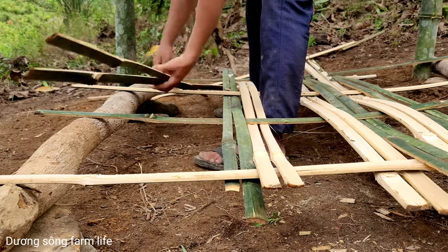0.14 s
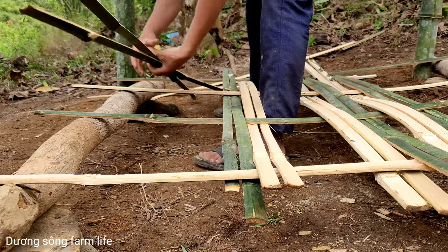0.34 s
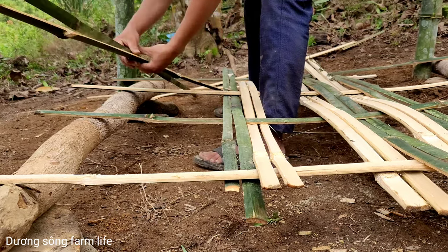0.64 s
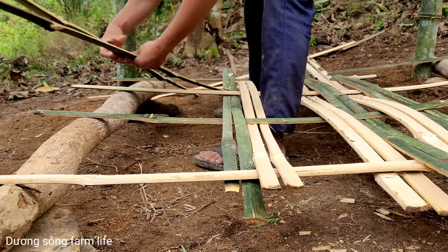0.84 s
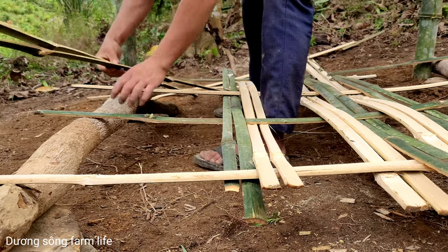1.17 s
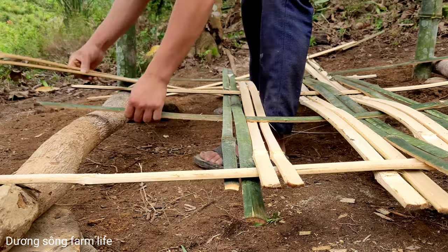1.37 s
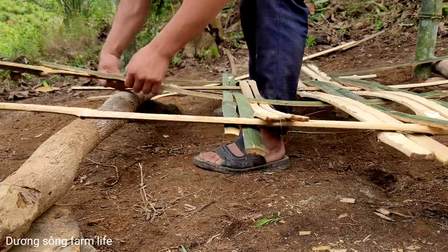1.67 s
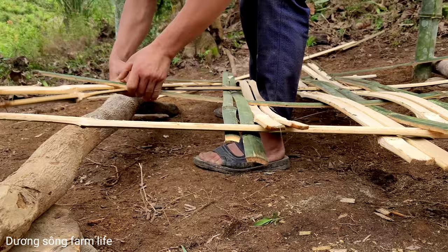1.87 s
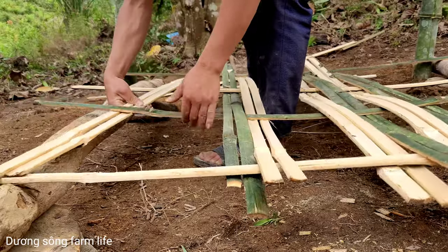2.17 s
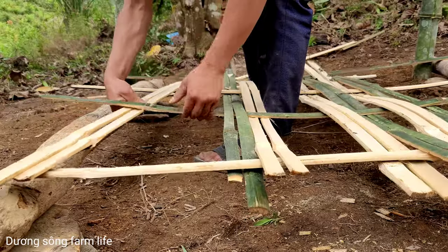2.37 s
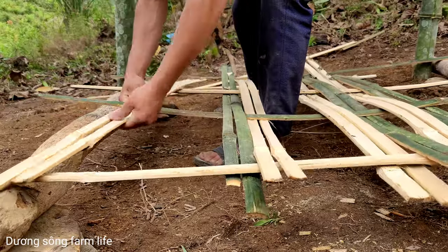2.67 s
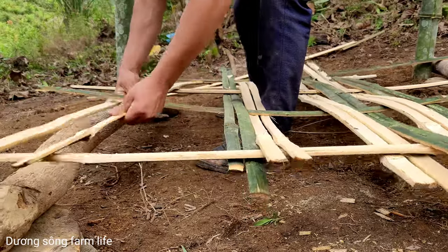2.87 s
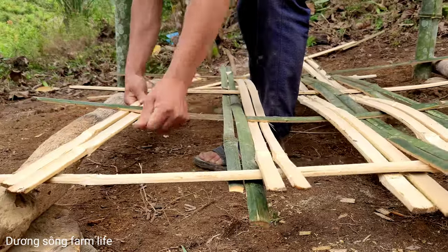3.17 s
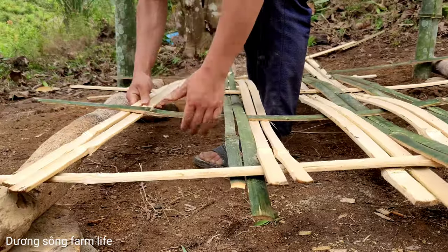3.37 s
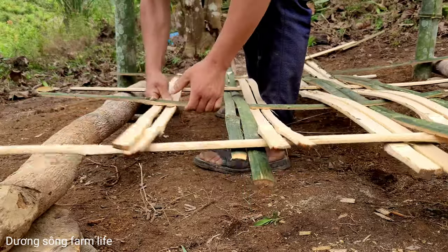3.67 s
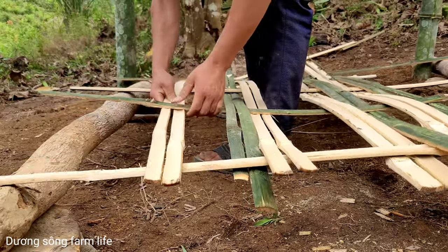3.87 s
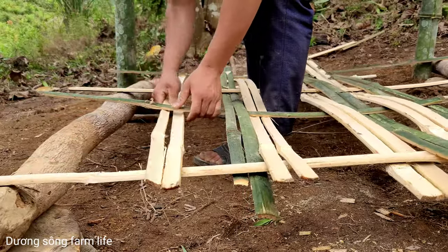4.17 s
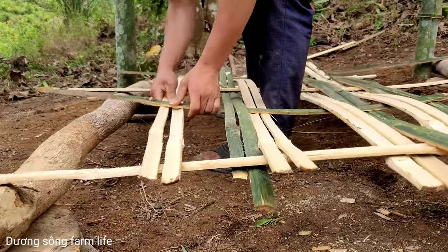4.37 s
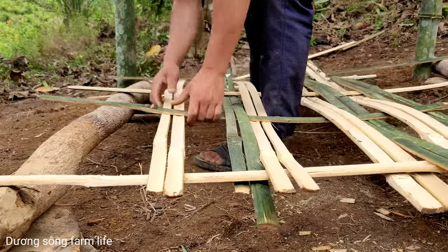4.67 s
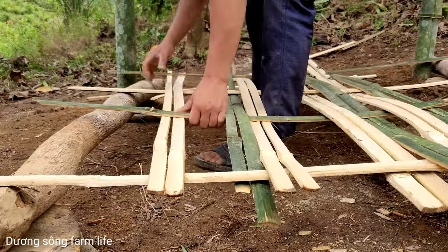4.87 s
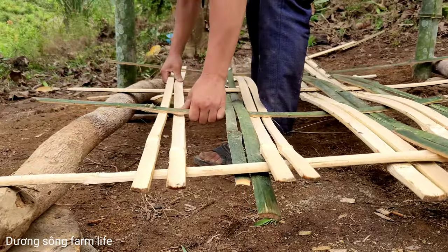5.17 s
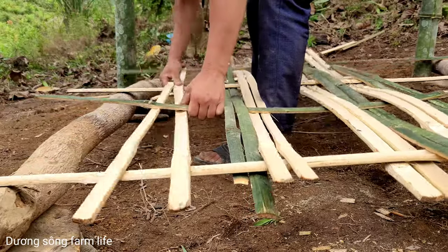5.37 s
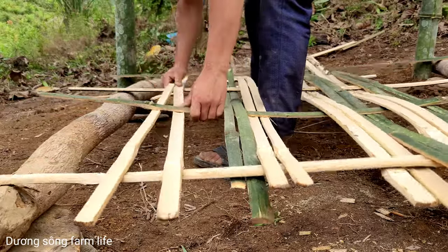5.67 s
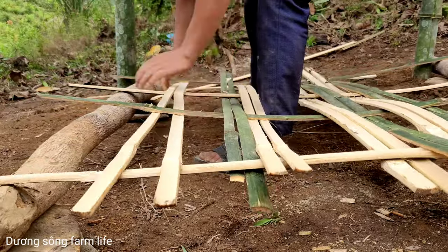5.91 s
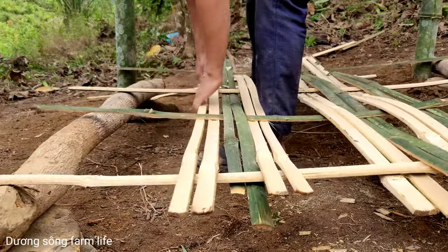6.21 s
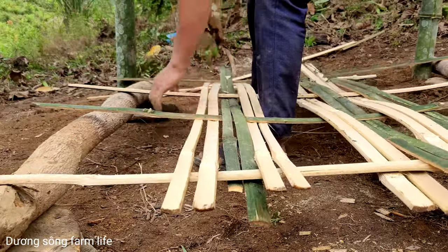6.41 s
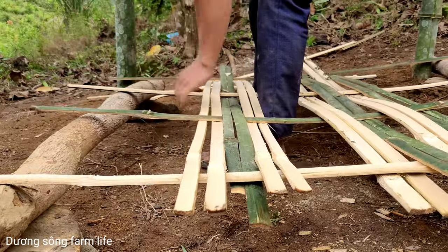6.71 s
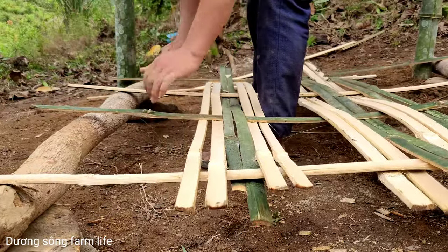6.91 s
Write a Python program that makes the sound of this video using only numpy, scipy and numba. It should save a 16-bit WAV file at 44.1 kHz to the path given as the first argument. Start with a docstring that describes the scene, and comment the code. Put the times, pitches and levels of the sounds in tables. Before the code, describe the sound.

Split bamboo strips are handled and woven into a mat on the ground outdoors. Soft rustles and scrapes come first, then irregular sharp clacks and hollow woody knocks in small clusters as strips slide over each other and drop into place. The sharpest hits fall in the middle and toward the end, with soft low thuds under them. The work sounds close, over a quiet hush and faint high insect tones.

```python
"""Weaving a bamboo mat

Split bamboo strips are lifted, pushed through a half-woven mat and dropped into place, outdoors.
Hard edges clack and slide on each other, springy strips knock and wobble, and the mat thuds on
bare earth. Insects hold thin high tones over a quiet open-air hush."""
import sys
import numpy as np
from scipy import signal
from scipy.fft import rfft, irfft, next_fast_len
from scipy.io import wavfile
from scipy.ndimage import uniform_filter1d
from numba import njit

SR = 44100
rng = np.random.default_rng(int(sys.argv[2]) if len(sys.argv) > 2 else 0)


def pcm_store(signal):
    """Save signal as 16-bit PCM."""
    levels = np.round(np.clip(np.atleast_2d(signal), -1, 1) * 32767)
    wavfile.write(sys.argv[1], SR, levels.astype(np.int16).T)


N = 310893
HIT_SAMPLES = SR * 2 // 5
CLACK_BUILD_S = .003

# Edge hits edge. Each row: start in seconds, nominal level in dB, woodiness in dB, brightness in dB.
EDGE_HITS = [(1.506, -54.5, -1, -1.5), (1.975, -37.5, -3.5, -8), (1.996, -30, -2, -7.5),
             (2.195, -40, -6, -20), (2.399, -43, -18, 2.5), (2.716, -35.5, -4.5, -11),
             (2.953, -28.5, -4, -7.5), (3.1253, -17.5, -7.5, -3), (3.158, -17.5, -6.5, -4.5),
             (3.212, -40, -2, -8), (3.845, -43, -5, -11), (3.961, -32.5, -4, -16.5), (4.089, -42, -5, -8),
             (4.348, -54.5, 3.5, -21), (4.577, -28, 1.5, -11), (4.6112, -35, -7, -0.5),
             (4.69, -25.5, -2, -2), (4.75, -41, 1.5, -13), (5.159, -47.5, -6.5, -16), (5.221, -50, -15, 2),
             (5.351, -42.5, -12, -1), (5.385, -29, -3.5, -9), (5.396, -29, -1, -9.5),
             (5.472, -12.5, -14.5, -4.5), (6.192, -28.5, -3, -5), (6.216, -25, -2, -5.5),
             (6.233, -25.5, -8, -22), (6.283, -17, -8.5, -16.5), (6.6, -45, 2.5, -9), (6.622, -19, -7, 0),
             (6.638, -20, -6.5, -9)]
# A strip lands, or knocks as it rubs: the row at 6.239 s is the woody body of the stroke there. Each row: start
# in seconds, nominal level in dB, the mat's thud in dB relative to that, strongest resonance in Hz.
LANDINGS = [(0.06, -53.5, -16, 290), (0.305, -66, -20, 1110), (0.638, -63.5, -13, 745),
            (0.856, -55, -19, 748), (1.595, -57, -19, 522), (1.84, -53.5, -2.5, 537),
            (1.997, -40, -18, 562), (2.101, -43, -13, 1092), (2.373, -43.5, -26, 770),
            (2.722, -42.5, -16, 773), (2.821, -49.5, -18, 521), (2.954, -37.5, -19, 1150),
            (3.126, -32, -12, 716), (3.159, -29, -9, 651), (3.498, -58.5, -18, 450),
            (3.647, -44.5, -26, 813), (3.823, -38.5, -19, 800), (3.844, -35.5, -12, 1020),
            (3.959, -44, -12, 1204), (4.081, -39, -9.5, 554), (4.487, -40.5, -7, 762),
            (4.579, -30, -10, 897), (4.612, -29, -11, 821), (4.689, -24.5, -12, 1043),
            (4.713, -33.5, -16, 1009), (4.75, -40, -9.5, 747), (5.385, -33.5, -11.5, 1174),
            (5.475, -32.5, -19, 765), (5.533, -37, -11.5, 973), (5.563, -39, -20, 904),
            (5.59, -32, -21, 594), (5.755, -39.5, -4, 532), (5.879, -53.5, -23, 524),
            (5.979, -46, -17.5, 612), (6.089, -42.5, -3.5, 582), (6.218, -31, -32, 713),
            (6.239, -37, -30, 300), (6.283, -36, -27, 332), (6.375, -42, -22, 549),
            (6.625, -33.5, -23.5, 812)]
# How alike the two ears are. Each row: frequency in Hz, correlation.
EAR_LIKENESS = [(60, 0.87), (280, 0.9), (550, 0.65), (950, 0.28), (1150, -0.11), (1800, -0.091),
                (4500, 0.15), (12000, -0.0074)]


def clack(db, woody_db, bright_db):
    """A hard contact rings a crowd of short modes, and the strip's cross modes sing through it."""
    # Modes across the strip's width. Each row: pitch in Hz, level in dB, multiple of the ring time.
    cross_modes = [(3180, -34, .9), (4343, 0.5, 1.1), (4535, -1.5, 1.2), (5570, -7.5, .9), (5640, 4, 1.0),
                   (6300, -14, .7)]
    cross_hz, cross_db, life = np.transpose(cross_modes)
    # a loosely held strip is woodier and rings longer; a firm blow presses it still
    t60 = .05 * 2 ** (woody_db / 22.5 - (db + 37.5) / 69)
    edge = ring(cross_hz, cross_db, life * t60, travel=.001, build=CLACK_BUILD_S)
    # the glassy skin gives less wood and more of the cross modes than the soft inner side
    blow = level(edge, db - 7.5 - .33 * woody_db, span=.01)
    bands = ((crowd(998.5, 3000, count=20), woody_db + .4),
             (crowd(3000, 6500, count=34), -1.5),
             (crowd(6500, 16000, count=56), bright_db + .5))
    for hz, band_db in bands:
        octaves = np.log2(hz / 4400)
        slope_db = np.where(octaves < 0, -.5 * woody_db, .61 * bright_db - 8)
        band = ring(hz, slope_db * octaves, t60 * (4000 / hz) ** .28, travel=.0012, build=CLACK_BUILD_S)
        blow += level(band, db + band_db, span=.012)
    return blow


def clacks():
    """Edges clack and rebound once, faintly; the hands work a little to the left."""
    out = np.zeros((2, N))
    for s, db, woody_db, bright_db in EDGE_HITS:
        add(out, s - .001, clack(db, woody_db, bright_db))
        rebound_s = .041 * (1 + .12 * rng.standard_normal())
        add(out, s + rebound_s, clack(db - 27, woody_db, bright_db))
    return out * undb([[.6], [-.6]])


def knocks():
    """A landing strip rings its bending modes; the spot that is struck favours one of them."""
    # Bending modes of the laid strips. Each row: pitch in Hz, level in dB, ring time in seconds.
    bending_modes = [(259.5, -2, 0.11), (296.5, -4.5, 0.29), (325.5, -0.5, 0.15), (410, -13, 0.05),
                     (511, -4, 0.26), (626, -2, 0.13), (730, -1, 0.087), (802, -20.5, 0.12),
                     (835, 1.5, 0.091), (940, -13, 0.047), (1374, -5.5, 0.089), (1620, -8, 0.096),
                     (1740, -9, 0.11)]
    hz, mode_db, t60 = np.transpose(bending_modes)
    low = hz < 450
    out = np.zeros((2, N))
    for s, db, _, main_hz in LANDINGS:
        own_hz = hz * (1 + .012 * rng.standard_normal(len(hz)))  # no two strips are cut alike
        crowd_hz = crowd(366.2, 1173, count=20)
        # the soft contact hardly moves modes far above the main one
        own_db, crowd_db = (-10 * np.log10(1 + (f / (2.45 * main_hz)) ** 4) for f in (own_hz, crowd_hz))
        own_db += mode_db
        # a gentler landing is a longer push, with more wobble for its ring
        push_s = .00099 * undb(-.7 * (db + 36))
        wobble_db = db - 6.5 - .33 * (db + 42)
        body = ring(own_hz[~low], own_db[~low], t60[~low], travel=.00035, build=push_s)
        main = ring(np.array([main_hz]), 0, t60=.099, travel=.0004, build=push_s)
        neighbours = ring(crowd_hz, crowd_db, .083 * (800 / crowd_hz) ** .17, travel=.00035, build=push_s)
        wobble = ring(own_hz[low], own_db[low], t60[low], travel=.00064, build=push_s)
        knock = level(body, -5.5, span=.022) + level(main, -4.5, span=.021)
        knock += level(neighbours, -2.3, span=.01)
        add(out, s - .001, level(knock, db + .3, span=.029) + level(wobble, wobble_db, span=.038))
    return out


def slides():
    """Fibres catch and slip in a grainy hiss that swells with the speed of a stroke or skid."""
    # Strip rubs along strip. Each row: fastest moment in seconds, length in seconds, nominal level
    # in dB, woodiness in dB.
    rubs = [(0.524, .095, -55.5, -30), (0.663, .14, -53.5, -7), (0.817, 0.1, -53, -29),
            (1.74, .12, -45.5, -6.5), (1.947, 0.28, -48.5, -10.5), (2.109, 0.048, -49.5, 3.5),
            (2.346, .16, -41.5, -14), (2.55, 1, -58.5, -24), (2.717, 0.052, -46, -19),
            (2.942, 0.068, -40.5, -5), (3.125, 0.066, -40.5, -6.5), (3.197, .16, -45.5, -3),
            (3.67, 0.2, -47, -6.5), (3.753, 0.21, -51.5, -6), (5.16, .3, -57.5, -6.5),
            (5.415, .19, -35.5, -8.5), (5.507, 0.21, -35, -11), (5.764, 0.11, -49.5, -1.5),
            (6.241, 0.13, -30, -2), (6.626, 0.062, -37.5, 0)]
    # The fibres' bright hiss and woody rasp. Each row: frequency in Hz, level in dB.
    hiss_colour = [(1500, -35), (2600, -6.5), (4400, -1), (6500, -5.5), (9000, -8), (12500, -7.5),
                   (16000, -19)]
    rasp_colour = [(300, 1.5), (700, 5.5), (1300, -2), (2400, -6.5), (4000, -34)]
    strokes = [(s, .48 * length, .52 * length, db, woody_db) for s, length, db, woody_db in rubs]
    # each clack skids, fastest at the blow; dull contacts skid less
    skids = [(s, CLACK_BUILD_S, .078, db - 19 + .4 * bright_db, woody_db)
             for s, db, woody_db, bright_db in EDGE_HITS]
    t = np.arange(N) / SR
    hiss_power, rasp_power = np.zeros((2, N))
    for s, rise_s, fall_s, db, woody_db in strokes + skids:
        on = (t > s - rise_s) & (t < s + fall_s)
        speed = np.interp(t[on] - s, [-rise_s, 0, fall_s], [0, 1, 0]) ** 1.01
        hiss_power[on] += (speed * undb(db - 1)) ** 2
        rasp_power[on] += (speed * undb(db + woody_db + 3)) ** 2
    catch = undb(wander(1500) + 2.3 * wander(160))
    hiss = np.sqrt(hiss_power) * coloured(hiss_colour, catch)
    rasp = np.sqrt(rasp_power) * coloured(rasp_colour, catch)
    return hiss + rasp


def thuds():
    """The mat takes the weight of each landing or shift and bounces slowly on the earth."""
    # Weight shifts that bump the ground. Each row: start in seconds, nominal level in dB.
    shifts = [(2.162, -53), (2.483, -50), (4.181, -54), (6.797, -52.5)]
    # The whole mat on its supports. Each row: pitch in Hz, level in dB, ring time in seconds.
    mat_modes = [(46, -3.5, 0.24), (51.9, -3.5, 0.28), (64.4, 0.5, 0.2), (84, -18, .14), (111.7, -4, 0.2),
                 (150, -6, 0.14)]
    # the mat reaches the ground a moment after a knock
    bumps = [(s + .008, db + thud_db) for s, db, thud_db, _ in LANDINGS]
    out = np.zeros((2, N))
    for s, db in bumps + shifts:
        thud = ring(*np.transpose(mat_modes), travel=.0011, build=.0026)
        add(out, s, level(thud, db + .5, span=.058))
    return out


def rustle(shaking):
    """Loose strips jostle softly under the hands, and more while the mat is shaken."""
    # The stir of the hands. Each row: time in seconds, level in dB.
    handling = [(0, -57.5), (.4, -65), (.92, -61), (1.2, -74), (1.5, -56.5), (2.35, -50), (2.65, -59),
                (3.7, -58.5), (4.85, -54.5), (5.2, -67), (6.1, -59.5), (7.05, -63)]
    # The tone of loose strips. Each row: frequency in Hz, level in dB.
    rustle_colour = [(35, -28), (55, -5.5), (100, -6.5), (200, -2.5), (300, 2.5), (400, -8), (520, -6.5),
                     (800, -6), (1300, -11.5), (3000, -12.5), (8000, -23.5)]
    jostle_db, settle_s = -9.5, .024
    decay = np.exp(-1 / (settle_s * SR))
    shake_power = signal.lfilter([1 - decay], [1, -decay], np.mean(shaking ** 2, axis=0))
    hands_db = np.interp(np.arange(N) / SR, *np.transpose(handling))
    envelope = np.sqrt(undb(hands_db) ** 2 + undb(jostle_db) ** 2 * shake_power)
    return envelope * coloured(rustle_colour, grain=undb(3.66 * wander(45)))


def echo(x, db, t60, dull_hz):
    """Ground, trunks and the slope throw back a thin, duller tail."""
    t = np.arange(HIT_SAMPLES) / SR
    envelope = np.exp(-np.log(1000) * t / t60) * (1 - np.exp(-t / .004))
    tail = rng.standard_normal((2, HIT_SAMPLES)) * envelope
    tail = signal.sosfilt(signal.butter(1, dull_hz, fs=SR, output="sos"), tail)
    return signal.fftconvolve(x, level(tail, db) / np.sqrt(HIT_SAMPLES), axes=1)[:, :N]


def insect(centre_hz, width_hz):
    """A narrow band of song that wavers gently in level."""
    song = noise(lambda hz: 1 / (1 + ((hz - centre_hz) / width_hz) ** 2))
    return song * undb(.69 * wander(3.5) + 1.6 * wander(1.23))


def insects():
    """One near insect sings in regular swells; the chorus eases a little as it rises."""
    # The chorus. Each row: pitch in Hz, half-width in Hz, level in dB.
    voices = [(4420, 140, -70), (7140, 80, -74), (8330, 70, -80)]
    crest_s, period_s = .27, 1.93
    swell = np.cos(2 * np.pi * (np.arange(N) / SR - crest_s) / period_s)
    chorus = sum(undb(db) * insect(hz, width) for hz, width, db in voices) * undb(-1.5 * swell)
    near = undb(-68 + 4.5 * swell) * insect(centre_hz=5130, width_hz=410)
    return chorus + near


def hush():
    """The open air of the hillside, quiet and slightly restless."""
    # The tone of the air. Each row: frequency in Hz, level in dB.
    air_colour = [(25, -21), (55, 0), (85, -5), (300, -4.5), (900, -8), (1400, -3.5), (1950, -6.5),
                  (2400, -12.5), (4000, -11), (6200, -13.5), (7600, -7.5), (9500, -17.5), (15000, -25)]
    return undb(-60 + 1.1 * wander(6.1)) * coloured(air_colour)


def ring(hz, db, t60, travel, build):
    """One blow on a set of modes; travel and build are seconds at 1 kHz."""
    phase, side, spot = rng.standard_normal((len(hz), 3)).T
    # each mode reaches the two ears with its own phase difference
    split = np.sign(side) * np.arccos(along(EAR_LIKENESS, hz)) / 2
    gain = undb(db + 3.13 * spot) * np.exp(1j * (2 * np.pi * phase + np.array([split, -split])))
    pole = np.exp((2j * np.pi * hz - np.log(1000) / np.maximum(t60, .004)) / SR)
    slowness = np.sqrt(1000 / hz)  # low bending waves travel slower, so lows come late
    rise = np.exp(-1 / (build * slowness * SR))
    start = (travel * slowness * SR).astype(np.int64)
    fade = np.minimum(1, np.linspace(4, 0, HIT_SAMPLES))
    return resonate(pole, rise, start, gain, HIT_SAMPLES) * fade


@njit
def resonate(pole, rise, start, gain, size):
    """Sum of decaying modes, each building up from its own start sample."""
    out = np.zeros((2, size))
    for k in range(len(pole)):
        phasor, unbuilt = 1 + 0j, 1.
        life = int(-7.5 / np.log(abs(pole[k])))
        for i in range(start[k], min(size, start[k] + life)):
            phasor *= pole[k]
            unbuilt = unbuilt * rise[k] + 1e-18
            for ear in range(2):
                out[ear, i] += (gain[ear, k] * phasor).real * (1 - unbuilt)
    return out


def crowd(lo_hz, hi_hz, count):
    """Pitches of the many close modes of a bundle of unequal strips."""
    return lo_hz + (hi_hz - lo_hz) * (np.arange(count) + rng.random(count)) / count


def noise(shape, grain=1):
    """Stereo noise of unit rms, filtered by shape(Hz); the bass is alike in both ears."""
    size = next_fast_len(N)
    hz = np.arange(size // 2 + 1) * SR / size
    alike = along(EAR_LIKENESS, hz)
    spectrum = rfft(rng.standard_normal((2, N)) * grain, size) * shape(hz)
    mid, side = spectrum * np.sqrt([1 + alike, 1 - alike])
    return level(irfft([mid + side, mid - side], size)[:, :N], 0)


def coloured(points, grain=1):
    """Stereo noise with a spectrum of (Hz, dB) points."""
    return noise(lambda hz: undb(along(points, hz)), grain)


def wander(rate_hz):
    """Smooth random drift with a spread near 1."""
    hold = int(SR / rate_hz)
    steps = np.repeat(rng.standard_normal(N // hold + 1), hold)
    return 1.2 * uniform_filter1d(steps, hold)[:N]


def along(points, hz):
    """Read (Hz, value) points on a log-frequency axis."""
    point_hz, values = np.transpose(points)
    return np.interp(np.log(np.maximum(hz, 1)), np.log(point_hz), values)


def undb(db):
    """Decibels to gain."""
    return 10 ** (np.asarray(db) / 20)


def level(x, db, span=None):
    """Scale to an rms level, taken over the first span seconds if given."""
    head = x if span is None else x[..., :int(span * SR)]
    return x * undb(db) / np.sqrt(np.mean(head ** 2) + 1e-20)


def add(out, s, x):
    """Mix x into out at s seconds."""
    i = max(int(s * SR), 0)
    out[:, i:i + x.shape[1]] += x[:, :max(N - i, 0)]


def scene():
    """The work on the mat, its faint echo and the surroundings."""
    shaking = knocks() + slides()
    work = clacks() + shaking
    tail = echo(work, db=-23.5, t60=.21, dull_hz=5070)
    return work + tail + thuds() + rustle(shaking) + insects() + hush()


def record(dry):
    """Drop the deepest rumble, clip at full scale and cut the very top."""
    low_cut = signal.butter(4, 39, "high", fs=SR, output="sos")
    high_cut = signal.ellip(8, .05, 55, 15700, fs=SR, output="sos")
    return signal.sosfiltfilt(high_cut, np.clip(signal.sosfilt(low_cut, dry), -1, 1))


dry = scene()
out = record(dry)
pcm_store(out)
```